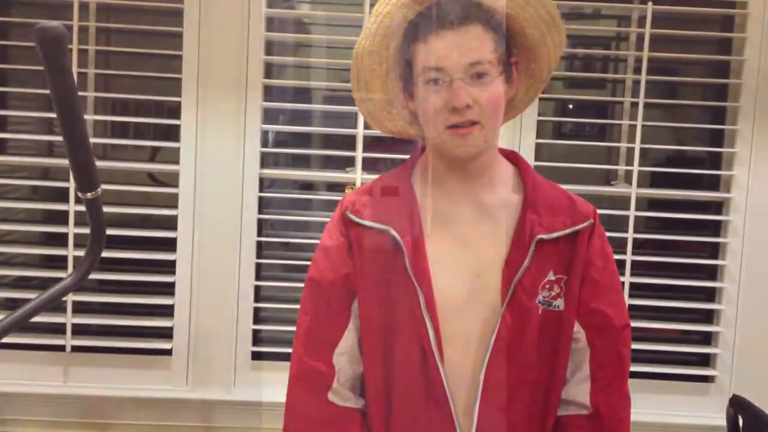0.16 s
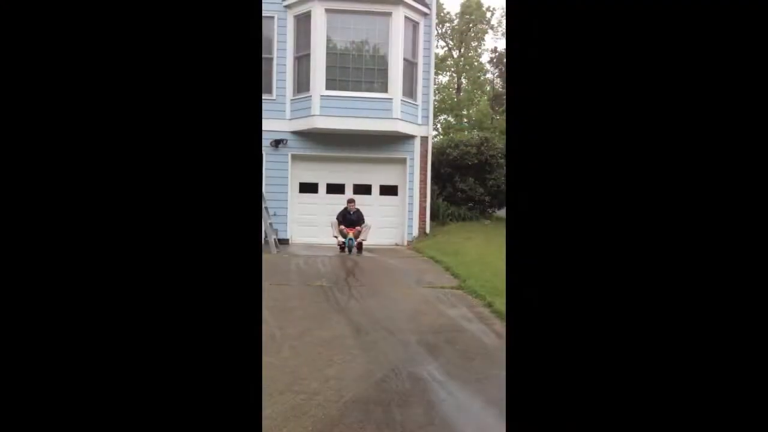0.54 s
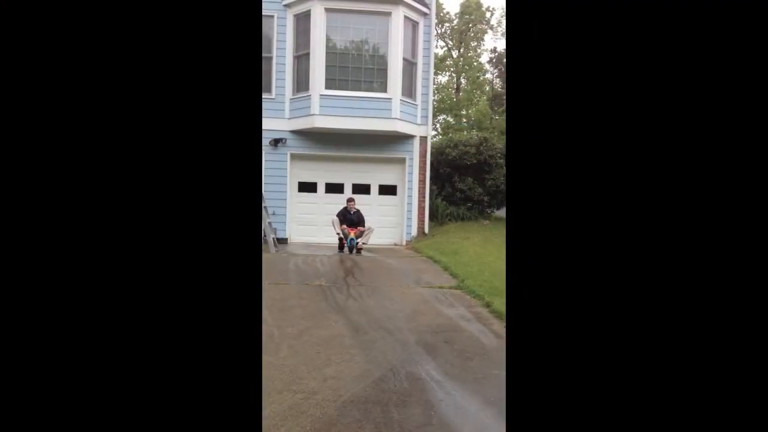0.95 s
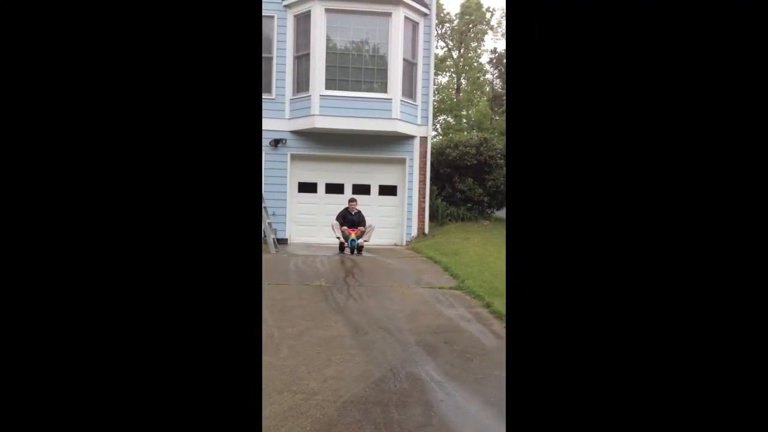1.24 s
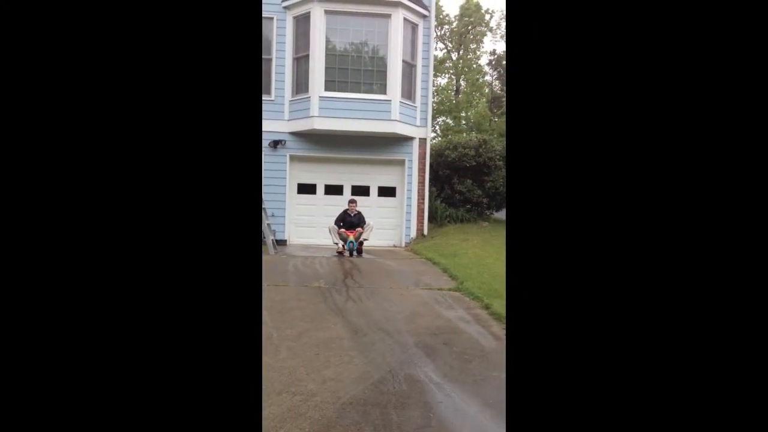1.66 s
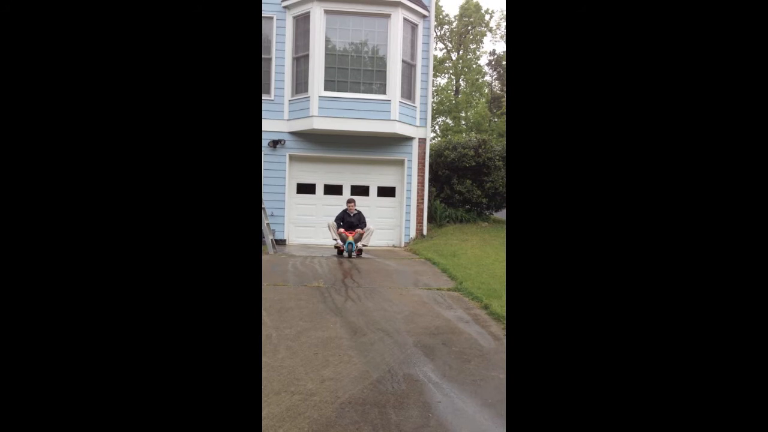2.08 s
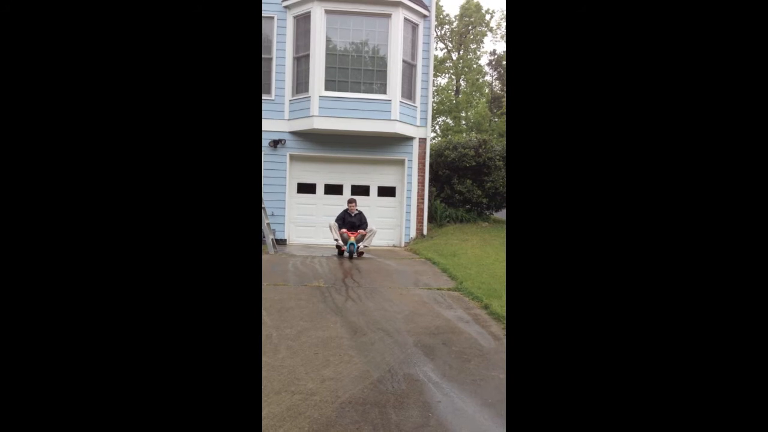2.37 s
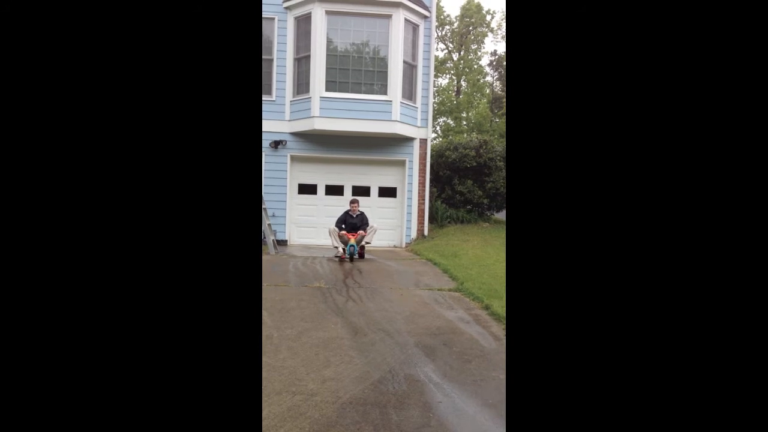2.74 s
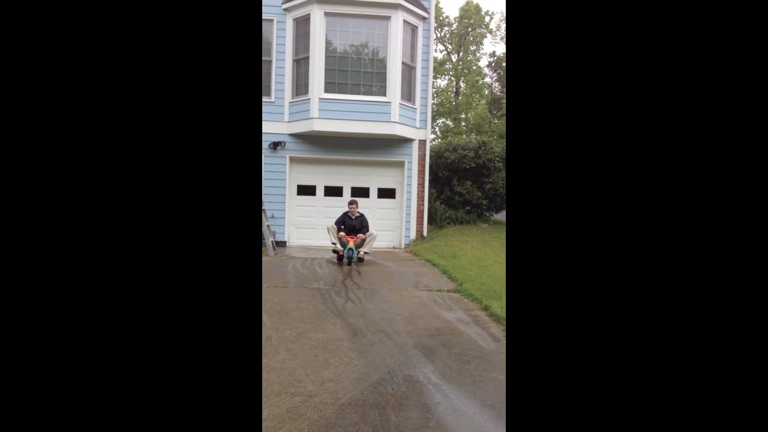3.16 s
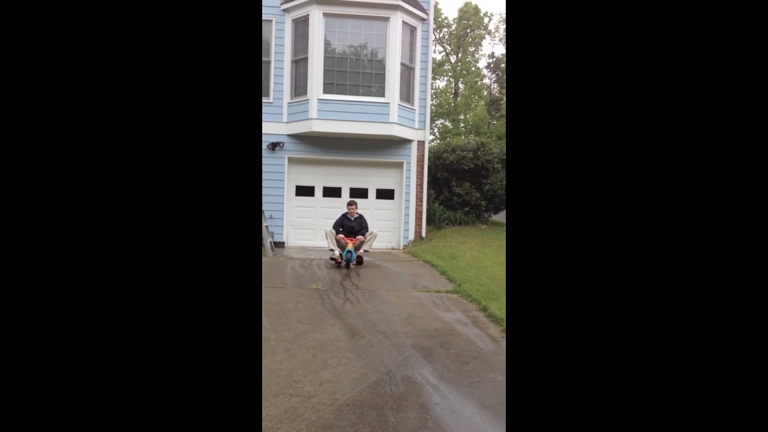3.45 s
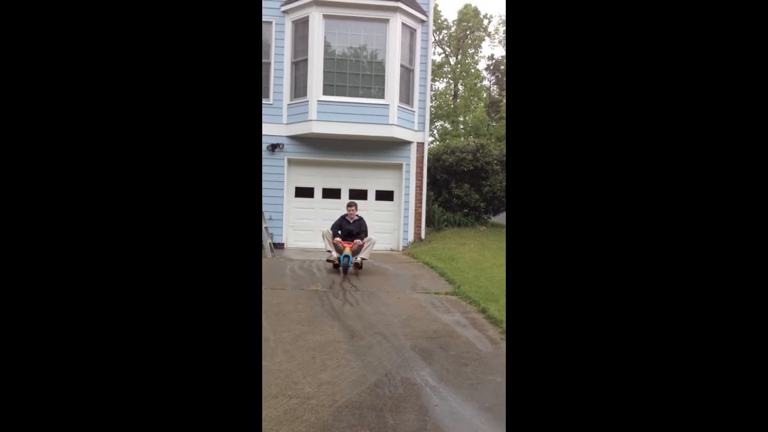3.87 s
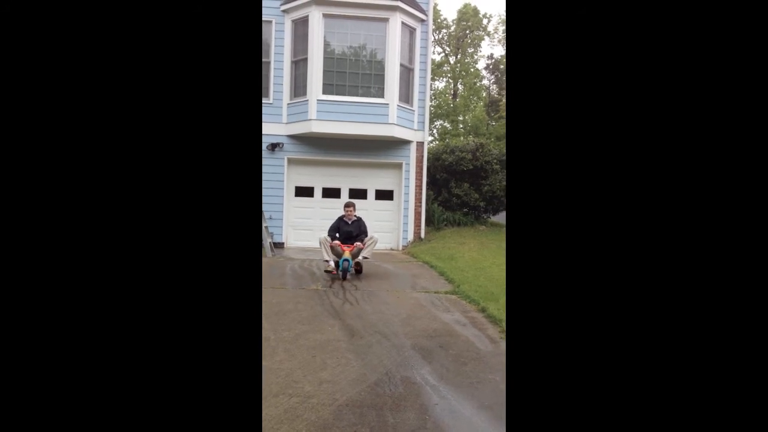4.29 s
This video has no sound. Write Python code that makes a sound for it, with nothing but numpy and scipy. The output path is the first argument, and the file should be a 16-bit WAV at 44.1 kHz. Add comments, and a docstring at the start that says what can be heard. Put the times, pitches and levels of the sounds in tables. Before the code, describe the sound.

Outdoor air fades in quietly with a few faint clacks, then a short high axle squeak and a scraping rim begin a run of hard, irregular plastic clacks. Small hollow wheels roll over gritty wet concrete, rumbling softly. Midway comes a brief drag and a dull shoe thud. The source is some way from a small, slightly hissy microphone, with a light slap off the garage front.

```python
"""A small tricycle with hollow plastic wheels rolls down a wet concrete drive, some way from the microphone.
Shaped noise as outdoor air swells first; faint clacks and a thin squeak follow, then hard clacks, a drag and a squeak.
Rolling adds grit (random grains) and rumble (noise bands); clacks strike ringing plastic modes throughout.
Midway a rim drags again and a shoe sets down (damped modes); jolts swell the rumble; grit is strongest at the end.
A door slap and a scattered tail follow each contact; faint microphone hiss is steady."""
import sys
import numpy as np
from scipy import signal
from scipy.fft import rfft, irfft
from scipy.io import wavfile

SR = 44100
rng = np.random.default_rng(int(sys.argv[2]) if len(sys.argv) > 2 else 0)


def wrap_up_sound(samples):
    """Save the sound to the file named by the first command line argument, as 16-bit audio."""
    columns = np.atleast_2d(samples).T
    # keep every value between -1 and 1, then stretch to whole-number steps
    tamed = np.clip(columns, -1, 1)
    steps = np.round(tamed * 32767).astype(np.int16)
    wavfile.write(sys.argv[1], SR, steps)


N = 194853
T = np.arange(N) / SR

# outdoor air spectrum: freq_hz, relative_density_db
AIR_SPECTRUM = [(18, -64), (30, -2), (174, 1.5), (394, 4.5), (540, -4), (702, -46), (4190, -17),
                (9710, -33), (14800, -10), (16000, -41)]
# air swells, then sinks: time_s, gain_db
AIR_FADE = [(0, -21), (.15, -14.5), (.3, -11.5), (.45, -4.5), (4.42, -10)]
# wheel cavities shaken by the slab: center_hz, width_hz, relative_level_db
RUMBLE_BANDS = [(179, 73, 3.5), (234, 54, 3.5), (321, 66, -6.5), (643, 315, 0), (829, 166, -3)]
# rolling: time_s, grit_drive_db, rumble_level_db
ROLLING = [(0, -80, -80), (.44, -70, -66.5), (.48, -61, -59.5), (.7, -57.5, -65), (1.2, -62, -64),
           (1.85, -57.5, -62.5), (2.34, -63.5, -59.5), (2.47, -52, -62.5), (2.66, -58.5, -62.5),
           (3.0, -59, -59.5), (3.38, -57.5, -57), (3.64, -57, -58.5), (3.8, -58.5, -60), (3.88, -55, -57),
           (4.2, -57, -56), (4.42, -49, -57)]
# rough patch, rumble swells: center_s, swell_db
JOLTS = [(1.91, 9), (2.636, 15.5), (3.83, 6), (3.96, 1.5), (4.148, 5.5), (4.32, 5)]
# shoe set down on concrete: start_s, drive_db
SHOE_THUDS = [(2.62, -32), (2.634, -19.5), (2.649, -21.5)]
# axle squeaks: start_s, hold_s, pitch_hz (before the glide), level_db
SQUEAKS = [(0.299, 0.047, 2020, -74.5), (0.503, 0.043, 2126, -46.5)]
# plastic modes, three tables: freq_hz, relative_level_db, t60_s
CAVITY_MODES = [(568.7, -4.5, 0.072), (652, -0.5, 0.021), (1163.6, -6, 0.093)]
FRAME_MODES = [(1301, -6, 0.012), (1643, -8, 0.031), (1838, -4.5, 0.0084), (2193, -15.5, 0.033)]
SHELL_MODES = [(2756, -2.5, 0.014), (3245, 0.5, 0.0055), (4240, -5, 0.013), (4354, 0.5, 0.012),
               (4632, 1.5, 0.0086), (6170, -2.5, 0.006), (6890, -6, 0.014), (7300, -9.5, 0.017),
               (8800, 5.5, 0.0023)]
# grit drive of each part re grit_drive_db: cavity_db, frame_db, shell_db, edge_db
GRIT_PARTS_DB = [-1, -3.5, -42, -8.5]
# rim drags sideways: start_s, hold_s, drive_db, cavity_db re drive, frame_db re drive
DRAGS = [(0.488, 0.07, -48.5, 10.5, -2.5), (2.575, 0.029, -49, -9, 5)]
# hard contacts: start_s, drive_db, cavity_db re drive, frame_db re drive, rattle_decay_ms
CLACKS = [(0.2092, -59, 2, -10, 5.3), (0.387, -54.5, 0, 3.5, 15), (.436, -51.5, -8, 0, 8.4),
          (0.4729, -25, -9, -9, 4.3), (0.5014, -20.5, -16, -12, 6.4), (0.5171, -20.5, -17, -3, 11),
          (0.538, -21, -12, -3, 3.1), (.622, -9.5, -33, -2, 7.1), (0.6372, -23, -4, 5.5, 9.3),
          (0.7106, -18, -27, -18, 7.3), (.8111, -21.5, -8, -35, 14), (.943, -32, -0.5, -56, 3.9),
          (1.045, -41, -8, -3, 5.1), (1.058, -33, 1, -1.5, 16), (1.0871, -22.5, -5.5, -20, 4.5),
          (1.2421, -36, 0, -11, 12), (1.272, -30, 0, -18, 19), (1.2988, -23.5, -3.5, 0, 19),
          (1.3645, -21, -7, -7.5, 8.6), (1.5466, -15, -26, -3, 4.6), (1.561, -32, 4, 8.5, 2.2),
          (1.576, -27.5, -2, -15, 9.7), (1.6762, -31, -13, -10, 7.3), (1.6833, -21.5, -0.5, 0.5, 22),
          (1.7165, -30.5, -19, -1, 5.8), (1.741, -35, -10, -8, 1.8), (1.783, -27.5, -1, 1, 18),
          (1.866, -25.5, -13, 2, 4.5), (1.8754, -9, -1, -5, 21), (2.002, -32, -18, -27, 8.5),
          (2.0121, -20, -10, -53, 2.9), (2.1333, -28.5, -2.5, -1, 7.4), (2.1882, -25.5, -2, -34, 3.7),
          (2.2323, -20.5, -7, -0.5, 5.4), (2.2742, -7, 0, -15, 5.7), (2.3871, -21, -24, 1.5, 2.3),
          (2.4251, -24, -9, -0.5, 26), (2.5378, -31, 0, -18, 8.3), (2.5648, -17.5, -14, -4, 2.6),
          (2.6959, -21.5, -30, 2.5, 4.5), (2.7174, -30.5, -41, 4.5, 13), (2.7695, -29, -11, 6.5, 2.7),
          (2.7947, -32.5, -2, 5.5, 5.2), (2.9115, -24.5, 0, 0, 21), (3.0711, -20, -6.5, -10, 7.3),
          (3.0966, -23, -7, -5, 12), (3.1975, -30, -3, -32, 3.9), (3.23, -7, -10, -16, 4.3),
          (3.2643, -8, -3.5, -23, 7.7), (3.2665, -8, -13, -11, 1.5), (3.4187, -32, -6, -3, 6.1),
          (3.4263, -66, -41.5, -11, 5.9), (3.471, -24.5, 0, -15, 3.8), (3.5619, -28.5, -5, 0, 6.6),
          (3.5811, -28.5, -15, 2.5, 9), (3.6072, -32, -10, 2.5, 7.4), (3.6592, -40, -14, 1, 5),
          (3.7204, -40, -10, -13, 2), (3.7406, -18.5, -4.5, -4.5, 2.8), (3.7657, -33.5, -12, 5.5, 4.8),
          (3.817, -34, -7, -19, 3.2), (3.8222, -22.5, -11, -38, 1.8), (3.84, -23, -14, -4, 1.7),
          (3.8495, -18.5, -11, -5.5, 15), (3.888, -12, -5.5, -4, 15), (3.911, -13, -21, -10, 5.6),
          (3.9961, -18.5, -15, 0.5, 2.7), (4.0236, -39, -3, 4, 5), (4.049, -24.5, -32, -3, 3.8),
          (4.12, -29.5, -20, -4, 3.9), (4.1537, -31.5, -20, -1, 16), (4.225, -28, 3, -19, 3),
          (4.2652, -28.5, -1, -9, 3.4), (4.2969, -26.5, -2, -1.5, 2.4), (4.3269, -29.5, -9, 2.5, 8.5),
          (4.3938, -33, -6, -10, 4.5), (4.4011, -22, -10, -26, 7.7)]

AIR_DB = -62.5   # rms before the fade
JOLT_S = 0.03   # swell half width, to 1/e of its dB
SQUEAK_EDGE_DB_PER_S, SQUEAK_GLIDE_HZ_PER_S = 1400, 770
DRAG_RISE_DB_PER_S, DRAG_FALL_DB_PER_S = 900, 356
CLACK_SHELL_DB, CLACK_EDGE_DB = -6.5, -8   # re clack drive
EDGE_PER_FRAME_DB = -0.05   # a clack on the frame is duller
RATTLE_DB, RATTLE_PER_DRIVE_DB, MEAN_DRIVE_DB = 2.14, -.4, -20   # hard clacks rattle less
CRACK_DB, CRACK_LOW_HZ = -10, 2420   # bare spike of first contact, re drive
SLAP_S, SLAP_DB, SLAP_SMEAR_S = .0168, -17, .002
TAIL_START_S, TAIL_RISE_S, TAIL_T60_S, TAIL_DB = .018, .014, .5, -8
ECHO_CLUMP_DB, ECHO_CLUMP_HZ = 2.5, 120   # scattered sound returns in uneven clumps
ECHO_LOW_HZ, ECHO_TOP_HZ = 950, 13300   # leaves and walls scatter little bass
MOVE_S = .1   # echo pattern renews as the tricycle moves on
HISS_DB, HISS_LOW_HZ = -72.5, 885   # microphone noise, rms before its high-pass
MIC_LOW_HZ, MIC_TOP_HZ, CUTOFF_HZ = 97, 15050, 16450


def from_db(db):
    """dB to gain."""
    return 10 ** (np.asarray(db) / 20)


def rms_one(x):
    """Scale to rms 1."""
    return x / np.sqrt(np.mean(x ** 2) + 1e-20)


def in_time(rows):
    """Interpolate each column of a curve to one value a sample."""
    time_s, *columns = np.transpose(rows)
    return [np.interp(T, time_s, column) for column in columns]


def passed(x, hz, kind, order=2):
    """Butterworth filter."""
    return signal.sosfilt(signal.butter(order, hz, kind, fs=SR, output="sos"), x)


def drift(rate_hz):
    """Low-passed noise, rms 1; the first second is dropped to settle the filter."""
    return rms_one(passed(rng.standard_normal(N + SR), rate_hz, "low")[SR:])


def stroke(start_s, hold_s, rise_db_per_s, fall_db_per_s):
    """Gain in dB: straight rise up to the start, hold, straight fall."""
    rise_db = -rise_db_per_s * np.maximum(start_s - T, 0)
    fall_db = -fall_db_per_s * np.maximum(T - start_s - hold_s, 0)
    return rise_db + fall_db


def ring(force, modes):
    """Force drives a bank of two-pole decaying modes, signs alternating."""
    out = 0
    for k, (freq_hz, level_db, t60_s) in enumerate(modes):
        radius = from_db(-60 / (t60_s * SR))
        angle = 2 * np.pi * freq_hz / SR
        numerator = [0, from_db(level_db) * np.sin(angle)]
        denominator = [1, -2 * radius * np.cos(angle), radius * radius]
        out = out + (-1) ** k * signal.lfilter(numerator, denominator, force + 1e-18)
    return out


def plastic(cavity, frame, shell, face, edge):
    """Five parts of a contact: cavity, frame and shell ring, the struck face cracks, its edge ticks."""
    knock = from_db(-30.0) * ring(cavity, CAVITY_MODES)
    knock = knock + from_db(-15.5) * ring(frame, FRAME_MODES)
    knock = knock + from_db(-13.5) * ring(shell, SHELL_MODES)
    crack = from_db(3.5) * passed(face, [2200, 6000], "band", order=3)
    tick = from_db(8) * passed(edge, 6430, "high")
    return knock + crack + tick


def air():
    """Smooth outdoor hiss: noise shaped in the spectrum, dB straight over log frequency."""
    freq_hz = np.maximum(np.fft.rfftfreq(N, 1 / SR), 1)
    point_hz, point_db = np.transpose(AIR_SPECTRUM)
    shape = from_db(np.interp(np.log(freq_hz), np.log(point_hz), point_db))
    return from_db(AIR_DB) * rms_one(irfft(rfft(rng.standard_normal(N)) * shape, N))


def rumble(level_db):
    """The rough slab shakes the wheels' air cavities: noise bands with slow level drift."""
    out = 0
    for center_hz, width_hz, band_db in RUMBLE_BANDS:
        band_hz = [center_hz - width_hz / 2, center_hz + width_hz / 2]
        shake = passed(rng.standard_normal(N), band_hz, "band")
        out = out + from_db(band_db) * rms_one(shake)
    return from_db(level_db + 1.05 * drift(3.3)) * rms_one(out)


def thuds():
    """A shoe sets down: a click drives a low resonance and two heavily damped ones."""
    force = np.zeros(N)
    for start_s, drive_db in SHOE_THUDS:
        force[round(start_s * SR)] = from_db(drive_db)
    return ring(force, [(238, -21.5, 0.11), (610, -7.0, 0.0084), (970, -5, 0.002)])


def squeak():
    """Axle squeaks: thin sines of unsteady level that glide up a little."""
    out = 0
    for start_s, hold_s, pitch_hz, level_db in SQUEAKS:
        glide_hz = pitch_hz + SQUEAK_GLIDE_HZ_PER_S * np.clip(T - start_s, 0, hold_s)
        edge_db = stroke(start_s, hold_s, SQUEAK_EDGE_DB_PER_S, SQUEAK_EDGE_DB_PER_S)
        out = out + from_db(level_db + edge_db) * np.sin(2 * np.pi * np.cumsum(glide_hz) / SR)
    return from_db(2.5 * drift(60)) * out


def grit(drive_db, cavity_db, frame_db, shell_db, edge_db, per_s, spread_db):
    """Grains of concrete crunch under the rims in clumps and excite the plastic."""
    born = rng.random(N) < per_s * from_db(5.0 * drift(30)) / SR
    size = from_db(spread_db * np.minimum(rng.exponential(1, N), 4))
    grains = born * size * rng.choice([-1, 1], N)
    grains = from_db(drive_db) * rms_one(grains)
    return plastic(*(from_db(db) * grains for db in (cavity_db, frame_db, shell_db, 0, edge_db)))


def clacks():
    """Each clack is one hard contact, then a short spiky rattle, different in each plastic part."""
    span = np.arange(1500)
    force, crack = np.zeros((5, N + 1500)), np.zeros(N)
    chance = rng.standard_normal((len(CLACKS), 6, 1500))
    for (start_s, drive_db, cavity_db, frame_db, decay_ms), draw in zip(CLACKS, chance):
        dying = np.exp(-span / (max(decay_ms, .3) * SR / 1000))
        # the sixth draw makes the rattle spiky
        rattle = draw[:5] * from_db(5.0 * draw[5]) * dying
        rattle_db = RATTLE_DB + RATTLE_PER_DRIVE_DB * (drive_db - MEAN_DRIVE_DB)
        rattle *= from_db(rattle_db) / np.linalg.norm(rattle, axis=1, keepdims=True)
        rattle[:, 0] = 1   # first contact
        edge_db = CLACK_EDGE_DB + EDGE_PER_FRAME_DB * (frame_db + 10)
        parts_db = np.array([cavity_db, frame_db, CLACK_SHELL_DB, 0, edge_db])
        at = round(start_s * SR)
        crack[at] = from_db(drive_db + CRACK_DB)
        force[:, at:at + 1500] += from_db(drive_db + parts_db)[:, None] * rattle
    return plastic(*force[:, :N]) + passed(crack, CRACK_LOW_HZ, "high")


def outdoors(x):
    """Direct sound, smeared slap from the garage door, then a late-swelling tail off house front and trees."""
    t = T[:SR // 2]
    late = np.maximum(t - TAIL_START_S, 0)
    tail = (1 - np.exp(-late / TAIL_RISE_S)) * from_db(-60 * late / TAIL_T60_S)
    slap = (t >= SLAP_S) * np.exp(-np.abs(t - SLAP_S) / SLAP_SMEAR_S)
    shape = from_db(TAIL_DB) * tail / np.linalg.norm(tail)
    shape = shape + from_db(SLAP_DB) * slap / np.linalg.norm(slap)
    step, echoes = round(MOVE_S * SR), np.zeros(N + SR)
    for at in range(0, N, step):
        clump_noise = rms_one(passed(rng.standard_normal(len(t)), ECHO_CLUMP_HZ, "low"))
        response = shape * from_db(ECHO_CLUMP_DB * clump_noise) * rng.standard_normal(len(t))
        echo = signal.fftconvolve(x[at:at + step], response)
        echoes[at:at + len(echo)] += echo
    echoes = passed(echoes[:N], ECHO_TOP_HZ, "low", order=1)
    return x + passed(echoes, ECHO_LOW_HZ, "high", order=1)


def scene():
    """Echoing tricycle contacts, plus dry rumble and fading air."""
    grit_db, rumble_db = in_time(ROLLING)
    wheels = clacks() + thuds() + squeak()
    wheels += grit(grit_db, *GRIT_PARTS_DB, per_s=900, spread_db=3.5)
    for start_s, hold_s, drive_db, cavity_db, frame_db in DRAGS:
        drag_db = drive_db + stroke(start_s, hold_s, DRAG_RISE_DB_PER_S, DRAG_FALL_DB_PER_S)
        wheels += grit(drag_db, cavity_db, frame_db, shell_db=-4.0, edge_db=-5.5, per_s=1400, spread_db=-4.0)
    swell_db = sum(db * np.exp(-((T - center_s) / JOLT_S) ** 2) for center_s, db in JOLTS)
    background = from_db(in_time(AIR_FADE)[0]) * air()
    return (outdoors(wheels) + rumble(rumble_db + swell_db) + background)[None]


def record(dry):
    """A small microphone adds hiss and lacks deep bass; two low-passes cut the top."""
    hiss = from_db(HISS_DB) * passed(rng.standard_normal(N), HISS_LOW_HZ, "high", order=1)
    x = passed(dry + hiss, MIC_LOW_HZ, "high")
    x = passed(x, MIC_TOP_HZ, "low", order=30)
    return signal.sosfilt(signal.cheby2(12, 60, CUTOFF_HZ, fs=SR, output="sos"), x)


dry = scene()
out = record(dry)
wrap_up_sound(out)
```